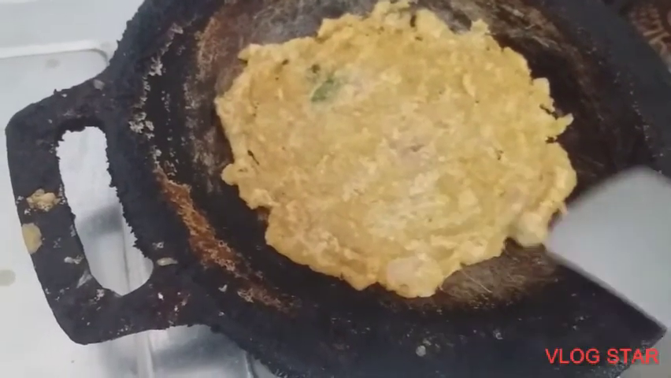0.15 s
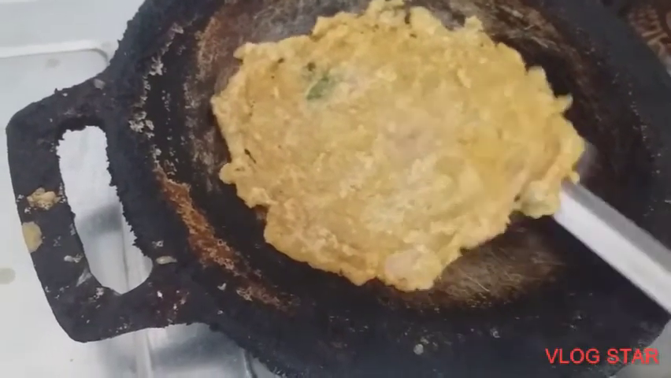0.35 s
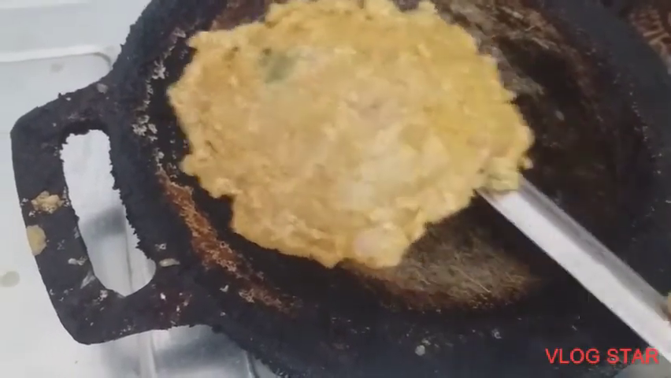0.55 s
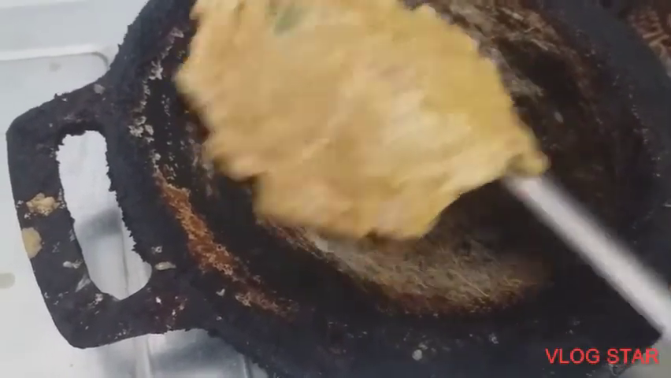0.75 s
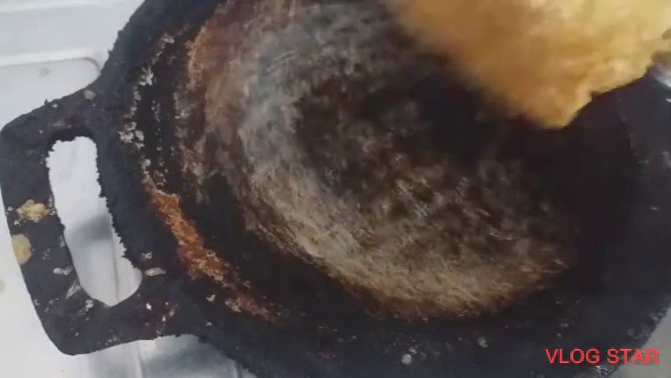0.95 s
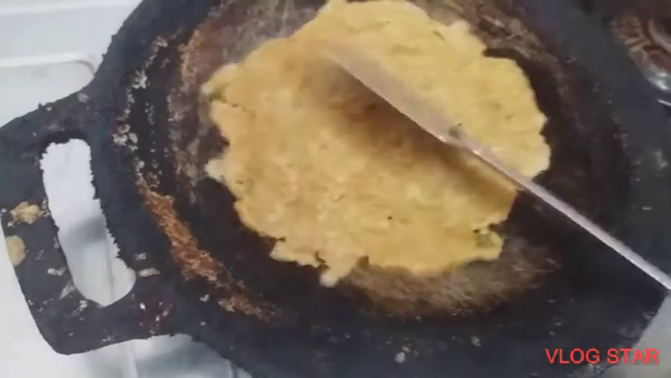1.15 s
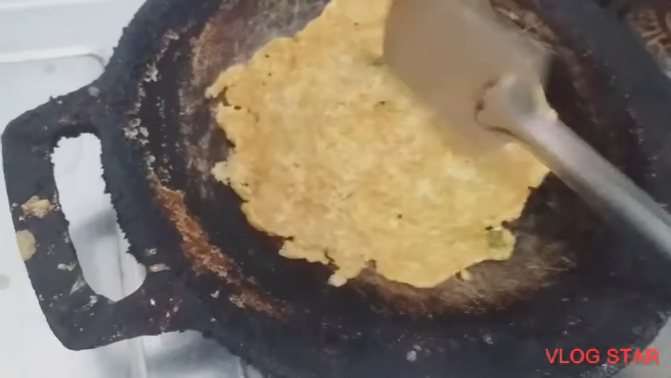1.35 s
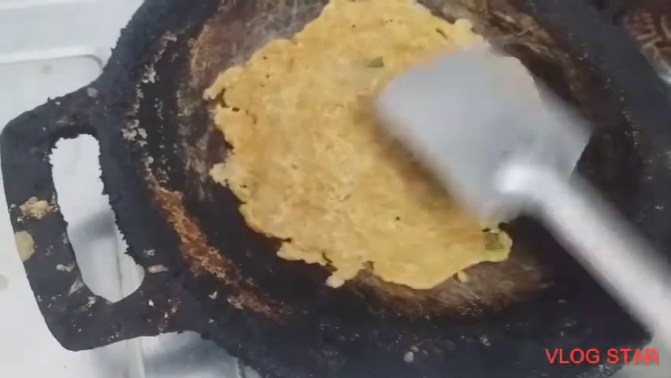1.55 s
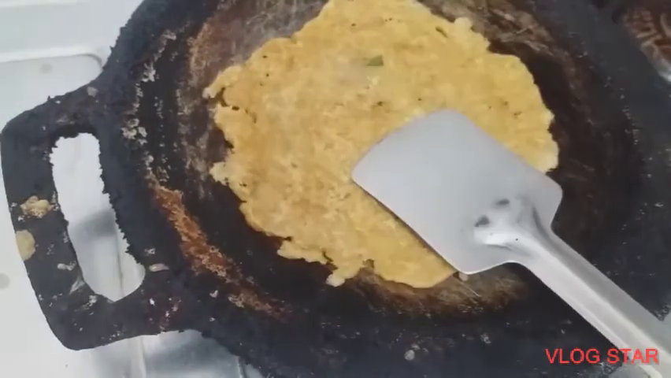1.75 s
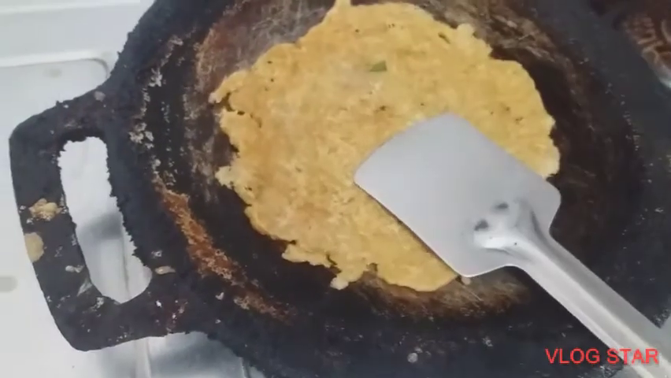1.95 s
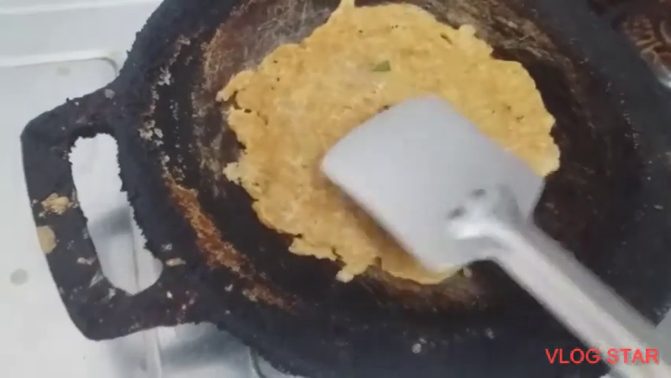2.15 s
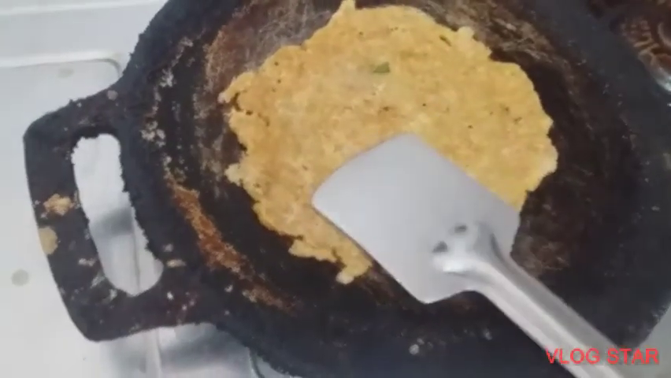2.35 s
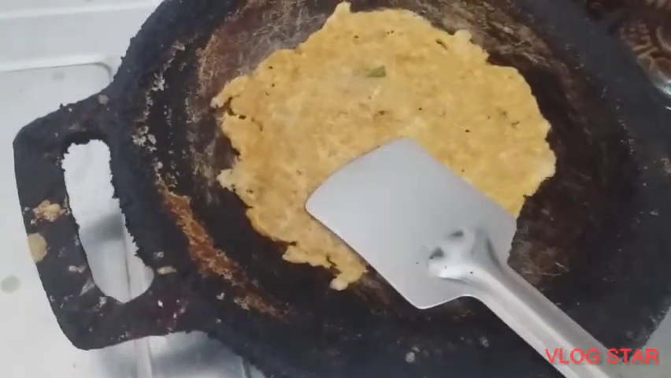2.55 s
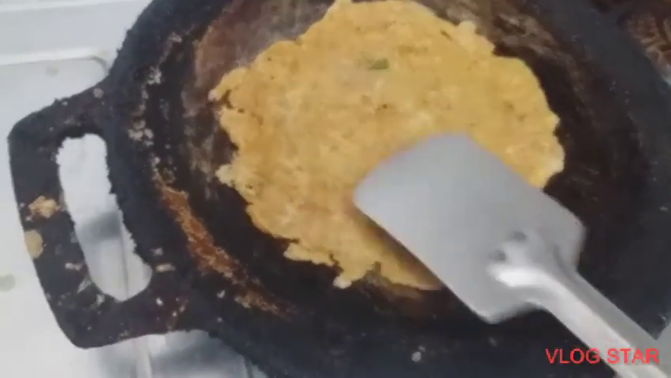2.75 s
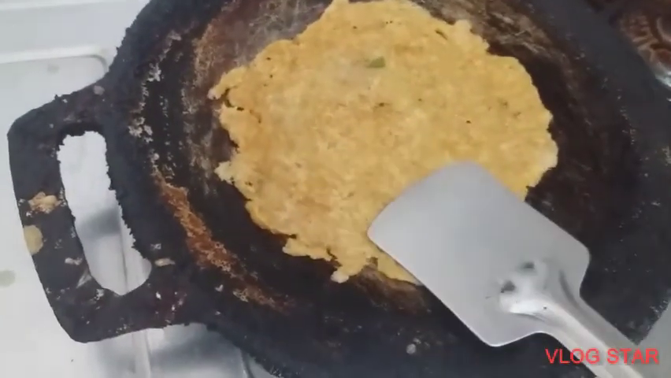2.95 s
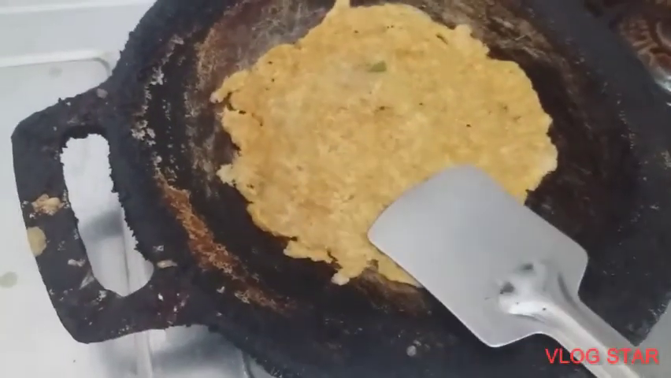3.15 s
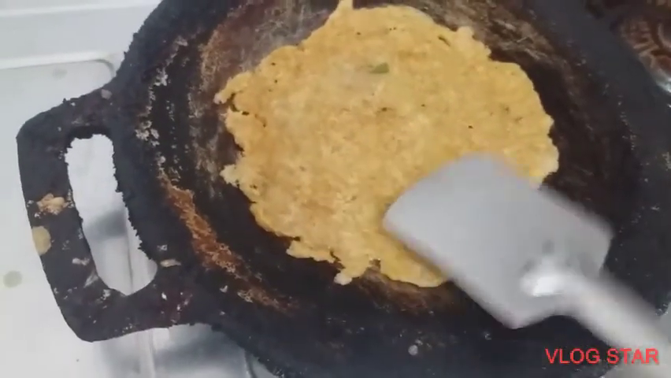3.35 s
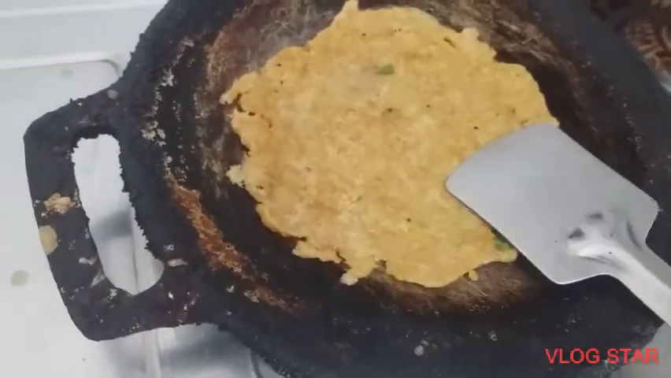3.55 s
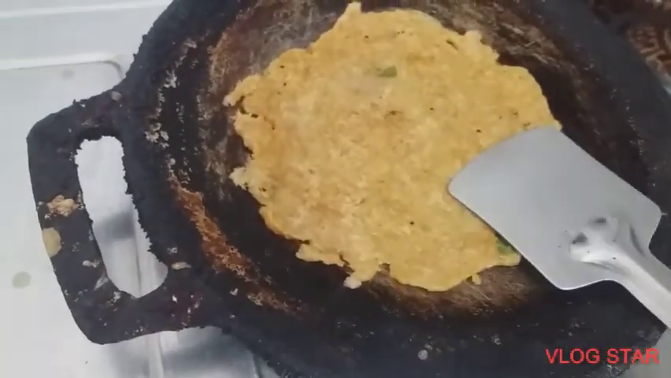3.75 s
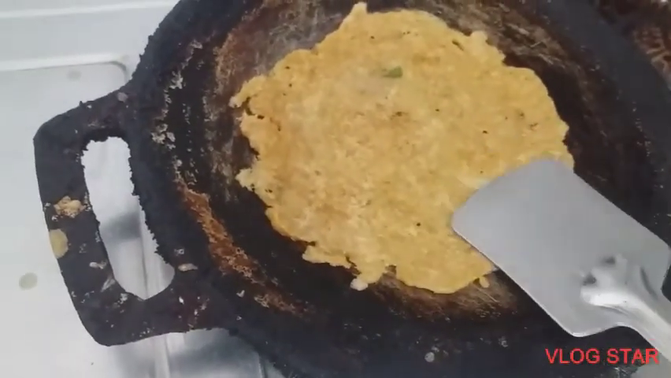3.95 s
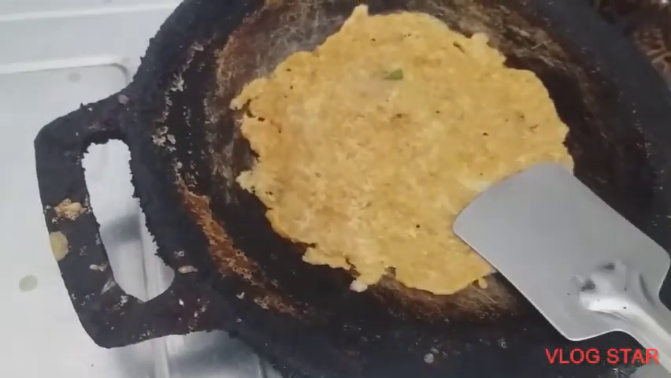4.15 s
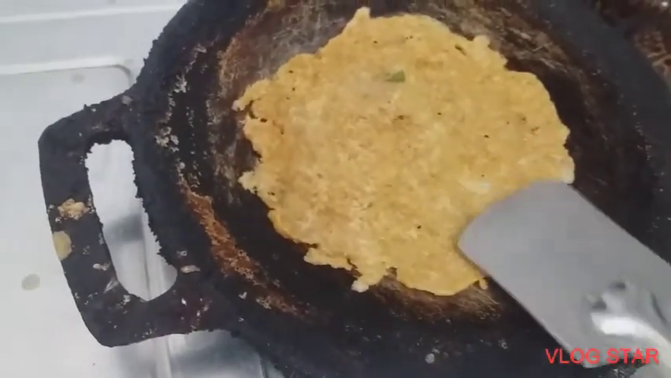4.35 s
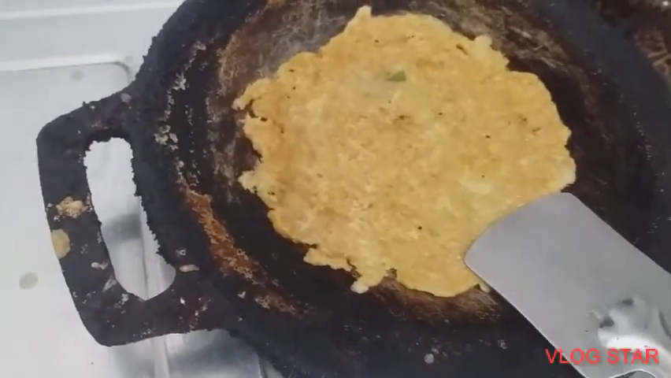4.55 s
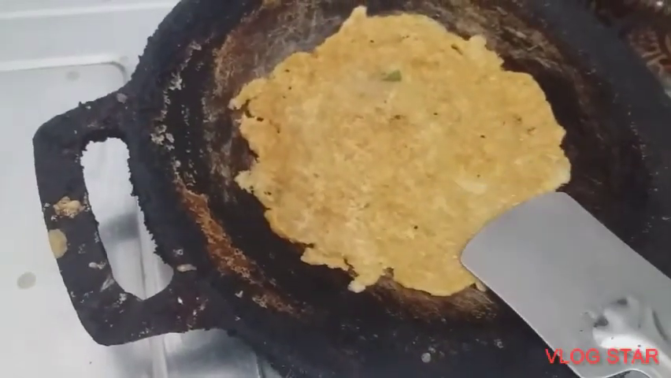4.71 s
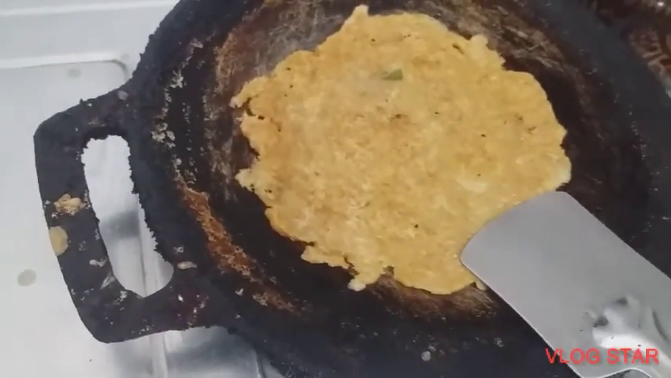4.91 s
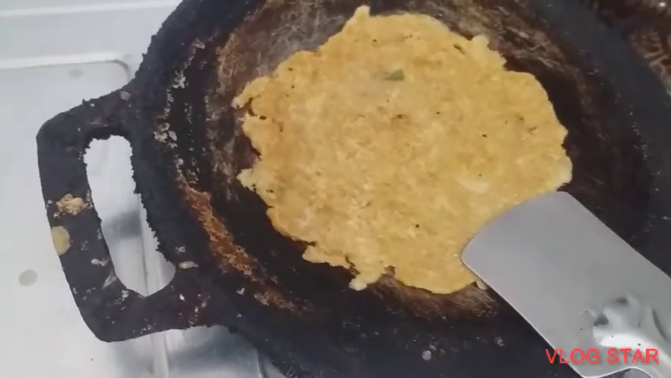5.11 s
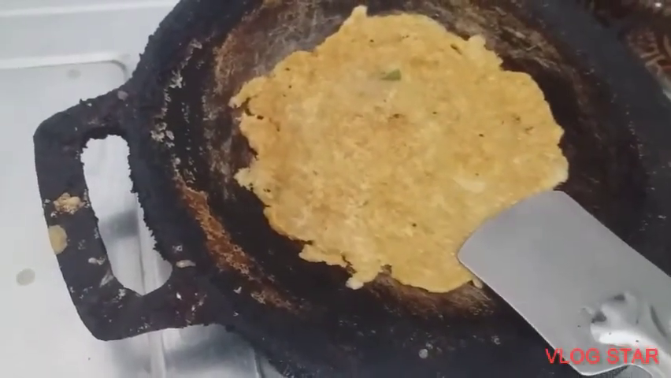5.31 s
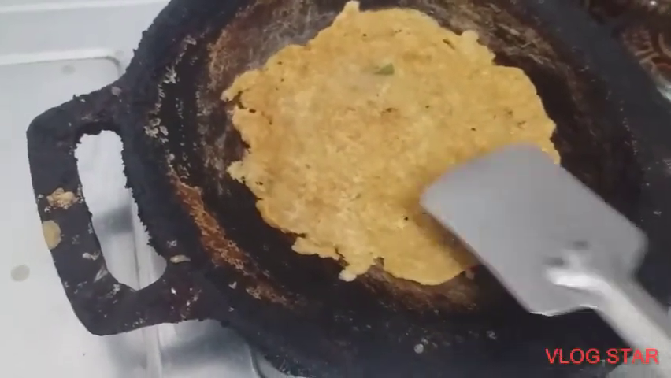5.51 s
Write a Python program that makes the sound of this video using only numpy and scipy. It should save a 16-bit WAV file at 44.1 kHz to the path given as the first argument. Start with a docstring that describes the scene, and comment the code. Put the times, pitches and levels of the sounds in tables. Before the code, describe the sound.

Close up in a small kitchen, a steel spatula pushes under a flatbread with a bright, ringing two-stroke scrape. After a short quiet gap the bread lands with a low thud, clatter and sharp snaps. A knock follows, then light presses make the crust crackle, busiest just after three seconds. It thins to sparse ticks before faint scratching near the end. Soft hiss and low hum sit beneath, with a short dull room echo.

```python
"""Flatbread on a griddle

A steel spatula slides under a flatbread on a cast-iron griddle, drops it back and presses it down several times.
Grit drives the blade's moving resonances as it scrapes; clicks, rings and noise make the crust crackle and snap.
The griddle thuds and rattles on the stove, through low and higher resonances and single decaying knocks.
Shaped noise and narrow hum lines fill the small kitchen, and feedback delays give its echo."""
import sys
import numpy as np
from scipy import signal
from scipy.fft import rfft, irfft, next_fast_len
from scipy.io import wavfile
from scipy.ndimage import uniform_filter1d

SR = 44100
rng = np.random.default_rng(int(sys.argv[2]) if len(sys.argv) > 2 else 0)


def transcribe(signal):
    """Save signal, clipped to [-1, 1], as a 16-bit WAV file at the path in sys.argv[1]."""
    frames = np.atleast_2d(signal).T
    limited = np.clip(frames, -1, 1)
    pcm = np.round(limited * 32767).astype(np.int16)
    wavfile.write(sys.argv[1], SR, pcm)


N = 250047
TIME = np.arange(N) / SR


def from_db(db):
    """Decibels to gain."""
    return 10 ** (np.asarray(db) / 20)


def to_db(gain):
    """Gain to decibels."""
    return 20 * np.log10(gain)


def rms_one(x):
    """Scale to rms 1."""
    return x / np.sqrt(np.mean(x ** 2) + 1e-20)


def lowpass(x, order, hz):
    """Butterworth lowpass."""
    return signal.sosfilt(signal.butter(order, hz, fs=SR, output="sos"), x)


def highpass(x, order, hz):
    """Butterworth highpass."""
    return signal.sosfilt(signal.butter(order, hz, "high", fs=SR, output="sos"), x)


def in_time(rows):
    """Columns of a curve table at every sample."""
    s, *columns = np.transpose(rows)
    return [np.interp(TIME, s, column) for column in columns]


def during(rows):
    """1 while a curve table lasts, with 20 ms fades."""
    fade_in = TIME - rows[0][0] + .02
    fade_out = rows[-1][0] - TIME
    return np.clip(np.minimum(fade_in, fade_out) / .02, 0, 1)


def peaked(start, end, rise_db_per_s, fall_db_per_s):
    """Gain 1 from start to end, rising before and falling after at steady dB rates."""
    before_db = (start - TIME) * rise_db_per_s
    after_db = (TIME - end) * fall_db_per_s
    return from_db(-np.maximum(0, np.maximum(before_db, after_db)))


def wander(n, count):
    """Slow chance: random points joined smoothly; spread about 1."""
    return signal.resample(rng.standard_normal(count), n)


def grains(per_s, spread_db):
    """Random clicks of either sign, their sizes spread exponentially in dB; rms 1."""
    sizes = from_db(spread_db * np.minimum(rng.exponential(1, N), 4))
    signed = sizes * rng.choice([-1, 1], N)
    return rms_one(signed * (rng.random(N) < per_s / SR))


def resonance(x, hz, width):
    """Two-pole resonance, gain 1 on top."""
    r = np.exp(-np.pi * width / SR)
    poles = [1, -2 * r * np.cos(2 * np.pi * hz / SR), r * r]
    return signal.lfilter([(1 - r * r) / 2, 0, (r * r - 1) / 2], poles, x)


def body(x, modes):
    """Resonances in parallel, signs alternating; the dB of each mode is its gain on top."""
    return sum((-1) ** k * from_db(db) * resonance(x, hz, width)
               for k, (hz, width, db) in enumerate(modes))


# Spectrum of the kitchen hiss. Each row: frequency in Hz, relative level in dB per Hz.
HISS_SPECTRUM = [(25, -28), (40, -13), (55, -7.5), (90, -7.5), (167, -10), (283, -14), (547, -12),
                 (1090, -15), (1840, -20), (5740, -23), (10000, -30.5), (16000, -27.5)]
HISS_RMS_DB = -58.0
# Hum lines. Each row: frequency in Hz, width in Hz, rms level in dB, steady share of the power from 0 to 1.
HUM_LINES = [(118, 30, -66, .1), (243, 10, -75, .2), (310, 12, -74, .2), (1086, 40, -72, .2),
             (380, 80, -60.5, .86)]


def background():
    """Smooth shaped hiss, and hum lines that are each a steady tone inside a narrow wavering band."""
    bin_hz = np.maximum(np.fft.rfftfreq(N, 1 / SR), 1)
    curve_hz, curve_db = np.transpose(HISS_SPECTRUM)
    shape_db = np.interp(np.log(bin_hz), np.log(curve_hz), curve_db)
    hiss = irfft(rfft(rng.standard_normal(N)) * from_db(shape_db), N)
    out = from_db(HISS_RMS_DB) * rms_one(hiss)
    white = rng.standard_normal(N + SR)   # the extra second lets the bands settle
    for hz, width, db, steady in HUM_LINES:
        band = rms_one(resonance(resonance(white, hz, width), hz, width)[SR:])
        tone = np.sqrt(2) * np.sin(2 * np.pi * hz * TIME)
        out += from_db(db) * (np.sqrt(steady) * tone + np.sqrt(1 - steady) * band)
    return out


KITCHEN_T60_S, KITCHEN_DB, WALL_CUT_HZ = 0.38, -19, 3300


def kitchen(x):
    """Ten feedback delays make the echo; dull walls take off treble on the way in."""
    size = next_fast_len(N + SR)
    w = 2 * np.pi * np.arange(size // 2 + 1) / size
    echoes = 0
    for k, lag in enumerate((rng.uniform(.009, .03, 10) * SR).astype(int)):
        loop = from_db(-60 * lag / SR / KITCHEN_T60_S) * np.exp(-1j * w * lag)
        echoes = echoes + (-1) ** k * loop / (1 - loop)   # all repeats of one delay
    dull = signal.lfilter(*signal.butter(1, WALL_CUT_HZ, fs=SR), x)
    return irfft(rfft(dull, size) * echoes, size)[:N]


# Griddle and stove top modes. Each row: frequency in Hz, width in Hz, gain in dB.
GRIDDLE_MODES = [(77.6, 28, -3), (115.8, 20, 2), (184, 56, -2), (242.8, 5.5, 6.5), (314, 49, 1),
                 (452, 86, 3), (583, 160, 1), (701, 130, 3.5), (884, 33, 3), (1008, 80, -1),
                 (1230.5, 10, 5), (1485, 420, -5.5)]
# Jolts of the griddle on the stove. Each row: time in seconds, deep thud level in dB,
# level in dB of the rattle above it before its lowpass.
GRIDDLE_JOLTS = [(0, -49, -47), (.082, -72, -58), (.4, -60, -55), (.526, -53, -63), (1.194, -37.5, -41),
                 (1.224, -45, -36.5), (1.696, -50, -66), (1.75, -52.5, -51), (1.994, -53, -57),
                 (2.324, -52.5, -54), (2.478, -56.5, -68), (2.64, -59.5, -58), (2.888, -66, -66),
                 (2.935, -54.5, -78), (2.952, -55, -42), (3.626, -49.5, -55), (3.69, -61, -52.5),
                 (4.95, -65, -70), (4.995, -64, -53.5)]
THUD_TOP_HZ, RATTLE_TOP_HZ = 400, 1480
JOLT_RISE_DB_PER_S, THUD_FALL_DB_PER_S, RATTLE_FALL_DB_PER_S = 606, 136, 232


def griddle():
    """Each jolt shakes the low modes into a thud and the higher ones into a shorter rattle."""
    low_modes = [mode for mode in GRIDDLE_MODES if mode[0] < THUD_TOP_HZ]
    high_modes = [mode for mode in GRIDDLE_MODES if mode[0] >= THUD_TOP_HZ]
    thud = rms_one(body(grains(500., spread_db=4.5), low_modes))
    rattle = rms_one(body(grains(900., spread_db=-1.5), high_modes))
    thud_gain, rattle_gain = 0, 0
    for s, thud_db, rattle_db in GRIDDLE_JOLTS:
        thud_gain = thud_gain + from_db(thud_db) * peaked(s, s, JOLT_RISE_DB_PER_S, THUD_FALL_DB_PER_S)
        rattle_gain = rattle_gain + from_db(rattle_db) * peaked(s, s, JOLT_RISE_DB_PER_S, RATTLE_FALL_DB_PER_S)
    return thud_gain * thud + rattle_gain * lowpass(rattle, 2, RATTLE_TOP_HZ)


# Single knocks of the griddle. Each row: start in seconds, level in dB before the soft rise,
# frequency in Hz of the mode that sings out, T60 in seconds.
GRIDDLE_KNOCKS = [(0.019, -36.5, 308, 0.11), (1.195, -34.5, 201, 0.061), (1.214, -29, 1207, 0.16),
                  (1.223, -28, 123, 0.11), (1.255, -34, 243, 0.22), (1.694, -19.5, 218, 0.031),
                  (1.712, -29.5, 121, 0.13), (1.755, -48.5, 238, 0.72), (1.97, -51, 112, 0.13),
                  (1.985, -41, 308.6, 0.21), (2.03, -55, 237, 0.39), (2.887, -29.5, 78, 0.11),
                  (2.921, -35, 119, 0.18), (3.613, -43.5, 309.7, 0.29)]


def knocks():
    """A soft blow: one mode swells with a time constant of about three cycles while it dies away."""
    out = np.zeros(N)
    for s, level_db, hz, t60 in GRIDDLE_KNOCKS:
        t = np.maximum(TIME - s, 0)
        soft_rise = 1 - np.exp(-t * hz / 2.9)
        out += from_db(level_db - 60 * t / t60) * soft_rise * np.sin(2 * np.pi * hz * t)
    return out


# The blade drags over the crust and hums. Each row: start in seconds, length in seconds, level in dB,
# lower ring in Hz.
BLADE_DRAGS = [(1.793, 0.26, -61, 2930), (2.45, 0.22, -65, 2400), (3.02, 0.28, -52, 3660),
               (4.703, 0.86, -62, 2880)]
DRAG_UPPER_RATIO, DRAG_UPPER_DB, DRAG_WIDTH_HZ, DRAG_FADE_DB_PER_S = 1.76, 1, 150, 153


def drags():
    """Grit under the resting blade rings two of its modes."""
    grit, out = grains(3000., spread_db=5.5), 0
    for s, length, db, hz in BLADE_DRAGS:
        lower = (hz, DRAG_WIDTH_HZ, 0)
        upper = (DRAG_UPPER_RATIO * hz, DRAG_UPPER_RATIO * DRAG_WIDTH_HZ, DRAG_UPPER_DB)
        gain = from_db(db) * peaked(s, s + length, DRAG_FADE_DB_PER_S, DRAG_FADE_DB_PER_S)
        out = out + gain * rms_one(body(grit, [lower, upper]))
    return out


# Modes of the blade resting on the bread. Each row: frequency in Hz, width in Hz,
# gain in dB lying flat, gain in dB tilted.
RESTING_BLADE = [(2020, 650, -1.5, -7), (2360, 84, 11, -9), (2815, 330, 5, -33), (3684, 75, -30, 13),
                 (4350, 1270, -4, -8.5), (4920, 330, 4.5, 3), (5640, 580, -3, 6.5), (6310, 1200, -9, 2)]


def resting_blade(x):
    """Colour a sound by the blade on the bread: once lying flat, once tilted."""
    flat = body(x, [(hz, width, flat_db) for hz, width, flat_db, _ in RESTING_BLADE])
    tilted = body(x, [(hz, width, tilted_db) for hz, width, _, tilted_db in RESTING_BLADE])
    return flat, tilted


# Bouts of crust crackle as the bread lands and the blade touches, presses and drags. Each row: start in
# seconds, length in seconds, relative level in dB, top octave in dB against that, blade tilt from 0 to 1.
CRACKLE_BOUTS = [(1.13, 0.015, -46.5, -10, 0.14), (1.171, 0.036, -36.5, -7, 0.22),
                 (1.205, 0.0087, -25, -6.5, 0.6), (1.226, 0.12, -54, -4, 0.24),
                 (1.692, 0.005, -40.5, -8.5, 0.33), (1.79, .28, -54, -11, 0.39),
                 (2.293, 0.0064, -50, -15, .3), (2.444, 0.21, -49.5, -7.5, 0.25),
                 (2.886, 0.032, -50.5, -25, 0.24), (3.02, 0.28, -50, -5.5, 0.48),
                 (3.086, 0.062, -41, -5, 0.96), (3.59, 0.5, -59.5, -7, 0.55),
                 (4.234, 0.071, -57, -2.5, 0.54), (4.633, 0.73, -56, -2.5, .45),
                 (4.934, 0.11, -52, -5.5, 0.38), (5.462, 0.027, -50, -3, 0.6)]
BOUT_RISE, BOUT_FALL, BOUT_FALL_S = 0.27, 0.35, .012   # time for 10 dB: shares of the length, added seconds


def bouts():
    """Gain of the crackle, gain of its top octave and power-weighted blade tilt, at every sample."""
    power, top_power, tilted_power = 1e-12, 1e-12, 0
    for s, length, db, top_db, tilt in CRACKLE_BOUTS:
        rise, fall = 10 / (BOUT_RISE * length), 10 / (BOUT_FALL * length + BOUT_FALL_S)
        bout_power = (from_db(db) * peaked(s, s + length, rise, fall)) ** 2
        power = power + bout_power
        top_power = top_power + bout_power * from_db(2 * top_db)
        tilted_power = tilted_power + bout_power * tilt
    return np.sqrt(power), np.sqrt(top_power), tilted_power / power


def crackle(gain, top_gain, tilt):
    """Dense small breaks in the crust, coloured by the blade that lies on it."""
    breaks = grains(4000., spread_db=4.0)
    flat, tilted = resting_blade(breaks)
    band = signal.butter(2, [1400, 7500], "band", fs=SR, output="sos")
    broad = rms_one(signal.sosfilt(band, breaks))
    top = rms_one(highpass(breaks, 4, 8500))
    ringing = (1 - tilt) * rms_one(flat) + tilt * rms_one(tilted) + from_db(-6) * broad
    return from_db(-5) * gain * ringing + from_db(-3) * top_gain * top


# Clear crust snaps and blade taps. Each row: start in seconds, relative peak in dB, ring in Hz,
# crack in dB against the ring, relative level of the top octave in dB.
CLEAR_SNAPS = [(.107, -24.5, 4500, 15, -8), (.349, -18, 5350, -14, -15), (.7896, -39, 6000, 15.5, -23),
               (1.1256, -34, 2800, -8, -11), (1.157, -34, 2150, 3, -22), (1.1804, -13.5, 2670, -11, -19),
               (1.197, -17, 2160, -24, -18), (1.2075, -13, 6030, 10, -18), (1.2113, -13, 5000, -6, -21),
               (1.222, -19, 2180, -3, -19), (1.2485, -20, 2116, -27.5, -20), (1.283, -22, 1570, -3, -12),
               (1.6937, -26.5, 3550, 0, -21), (1.7909, -36, 5040, 12, -12), (1.85, -27, 4820, -2, -12),
               (1.8742, -32.5, 5860, 15, -18), (1.925, -23.5, 5760, -2, -21), (1.9326, -31, 2850, -7, -23),
               (2.018, -35, 2960, -4, -18), (2.071, -35.5, 5930, 1, -18), (2.2965, -38, 2820, -2, -11),
               (2.355, -37.5, 2880, 1, -24), (2.478, -29, 2430, -4, -17), (2.497, -24.5, 2380, -3, -8),
               (2.5014, -31, 4590, 2, -12), (2.5398, -35, 5070, 8, -6), (2.573, -37, 4310, -5, -4),
               (2.5908, -31, 2920, 6, -9), (2.6332, -22.5, 2340, 4, -26), (2.6643, -34, 2010, -3, -24),
               (2.7075, -37, 2990, 11, -8), (2.8868, -32, 3960, -9, -8), (2.8998, -24.5, 6030, 1, -25),
               (2.9255, -32, 6000, -6, -27), (2.9414, -30.5, 3600, -18, -30), (2.995, -36, 3730, 1, -5),
               (3.0294, -32, 3800, -7, -7), (3.0608, -24, 5900, -6, -18), (3.085, -20, 3610, -18, -5.5),
               (3.1221, -23, 2220, -22, -9), (3.1339, -14.5, 3580, 2, -14), (3.1375, -20, 3820, 2, -5),
               (3.143, -17.5, 2740, -4, -22), (3.1555, -27, 5030, 0, -10), (3.1918, -31, 4000, 15, -13),
               (3.2334, -31, 3600, 9, -11), (3.262, -29, 2670, 5, -19), (3.2767, -30.5, 4000, -4, -15),
               (3.2832, -31, 3000, 12, -12), (3.2937, -33, 3700, -11, -18), (3.3205, -11.5, 3920, 7, -16),
               (3.323, -22, 2760, -2, -22), (3.3294, -23, 3550, 4, -21), (3.3444, -31, 4330, 9, -14),
               (3.358, -37, 6430, 0, -7), (3.5807, -37, 5100, -3, -9), (3.5851, -36, 3800, 6, -11),
               (3.615, -39.5, 3850, -9, -17), (3.7515, -40.5, 6150, 17, -5), (4.095, -43, 5000, 4, -2),
               (4.2445, -35, 6220, 1, -6), (4.282, -44, 5800, 2, -1), (4.729, -41, 3180, 14, -14),
               (4.9377, -33, 2720, -6, -7), (4.942, -33, 4870, -7, -23), (4.9573, -37, 4820, -3, -14),
               (4.979, -31.5, 6000, -2, -13), (4.9878, -32, 2760, 0, -8), (5.049, -45, 2920, -5, -15),
               (5.1865, -40, 4730, -15, -3), (5.214, -32.5, 2800, 2, -9), (5.2208, -29, 4980, -8, -26),
               (5.3032, -31, 4570, -7, -6), (5.3198, -20, 4900, 4, -11), (5.4358, -34, 4930, -1, -4),
               (5.462, -32, 5540, 11, -15), (5.47, -29.5, 4640, -2, 0), (5.4828, -28, 5030, 6, -18),
               (5.4903, -28.5, 4570, 0, -12), (5.503, -34, 4700, 2, -21)]
SNAP_TRIM_DB, TICK_TRIM_DB, CRUMBLE_DB = -7.5, 5.5, 4.0   # applied to all snaps, their ticks, their crumbles
CRACK_HZ, CRACK_T60_S, TICK_T60_S = 4060, 0.0011, 0.014
SNAP_T60_S, SHARP_SHORTENS = 0.011, 0.37   # ring T60 at 0 dB of crack; dB it shortens for each dB of crack
CRUMBLE_LASTS = 1.63   # times the ring
# random faint snaps: rate, highest peak above the crackle, top octave against that of the crackle
FAINT_PER_S, FAINT_DB, FAINT_TOP_DB = 25., 15, -6.5


def faint_snaps(gain, top_gain):
    """Rows for small snaps at random times, which follow the level of the crackle."""
    at = np.flatnonzero(rng.random(N) < FAINT_PER_S / SR)
    size, pitch, sharpness = rng.random((3, len(at)))
    peak_db = to_db(gain[at]) + FAINT_DB - 8 * size
    top_db = to_db((top_gain / gain)[at]) + FAINT_TOP_DB
    return np.transpose([at / SR, peak_db, 2400 * 2.6 ** pitch, 12 * sharpness - 6, top_db])


def snaps(gain, top_gain, blade_tilt):
    """Each snap is a sharp crack, a short ring with a pitch of its own, a brief crumble and a bright tick."""
    length = 3000   # samples
    out, t = np.zeros(N + length), np.arange(length) / SR
    rows = np.vstack([CLEAR_SNAPS, faint_snaps(gain, top_gain)])
    rough = rng.standard_normal((len(rows), length))
    ticks = highpass(rough, 4, 8500) * from_db(-60 * t / TICK_T60_S)
    tilt = blade_tilt[(rows[:, :1] * SR).astype(int)]
    flat, tilted = resting_blade(rough)
    crumbs = (1 - tilt) * flat + tilt * tilted
    crack = np.sin(2 * np.pi * CRACK_HZ * t) * from_db(-60 * t / CRACK_T60_S)
    for (s, peak_db, hz, crack_db, top_db), tick, crumb in zip(rows, ticks, crumbs):
        t60 = SNAP_T60_S * from_db(-SHARP_SHORTENS * crack_db)
        ring = np.sin(2 * np.pi * hz * t) * from_db(-60 * t / t60)
        crumble = from_db(CRUMBLE_DB) * crumb * from_db(-60 * t / (CRUMBLE_LASTS * t60))
        sound = ring + crumble + from_db(crack_db) * crack + from_db(top_db + TICK_TRIM_DB) * tick
        at = round(s * SR)
        out[at:at + length] += from_db(peak_db + SNAP_TRIM_DB) * highpass(sound, 2, 1500)
    return out[:N]


# The slide under the bread, two pushes. Each row: time in seconds, level in dB.
SLIDE_LEVEL = [(0, -46.5), (.05, -49.5), (.11, -36), (.2, -31), (.26, -37), (.32, -33), (.4, -23),
               (.46, -27), (.55, -38), (.7, -52), (.9, -62)]
# Stage of the stroke. Each row: time in seconds, stage (0 blade free, 1 under the bread, 2 lifting off).
STROKE_STAGE = [(0, 0), (.1, 0), (.2, .3), (.3, .6), (.395, 1), (.49, 1.1), (.6, 2), (.9, 2)]
# Blade mode pitches. Each row: frequency in Hz at stages 0, 1 and 2.
BLADE_PITCHES = [(727, 760, 760), (1260, 1110, 1170), (1650, 1870, 1860), (1640, 1710, 1730),
                 (2100, 2160, 2150), (2520, 2340, 2500), (2740, 2890, 2760), (2900, 3020, 3050),
                 (3300, 3420, 3400), (3670, 3770, 3950), (4140, 4270, 4250), (4790, 4600, 4670),
                 (5250, 5010, 5160), (5400, 5310, 5480), (5700, 5880, 5860), (6210, 6300, 6250),
                 (8870, 8900, 8900), (9750, 9930, 9750), (10800, 10800, 11000), (11500, 11600, 11600),
                 (12200, 12800, 12000), (12900, 13400, 13400), (13300, 14200, 13700), (15300, 15300, 15400)]
# Blade mode strengths, in the order of the pitches. Each row: width in Hz, then the gain in dB
# at each of the level stages.
BLADE_LEVELS = [(29.6, -4.5, -14, -51, -11.5, -1.5), (24.6, -12, -0.5, -12, -18, 7.5),
                (31.2, -20, 4.5, -29, 12, -5), (58, -16, -41, -43, -48, -2.5),
                (40, -1.5, -42, -22, -0.5, 3), (59, -29, -42, -5, 0.5, -4), (67.7, -5, 9, -4, 7.5, 3.5),
                (49.6, 0, -19, 5, -8, 3), (50, -5, -20, -24, -11, -8), (70.5, -7, -13, -22, -9, -2),
                (50.4, 0.5, -0.5, 3, 4, -3), (45, -4, -3, -1.5, 6.5, 1), (60, -5, 2.5, -6, -5, 1),
                (45.2, -5, -6, -10, -33, 4), (85, -1.5, -40, -15, -37, -3), (90, -7, -27, -13, -43, -12),
                (60.6, -15, -23, -31, -43, -24.0), (60.6, -15, -14, -23, -15, -22),
                (50, -24, -25, -8, -10, -32), (60, -21, -13, -24, -22, -21), (68, -11, -25, -12, -13, -24),
                (90, -17, -17, -10, -32, -18.0), (45, -11, -2, -15.0, -29, -12.0),
                (71, -20, -36, -10, -34, -18)]
# Stages of the stroke at which those gains are given, a plain list.
LEVEL_STAGES = [0, .35, .7, 1, 2]
RASP_DB, RASP_SINKS = -29.5, 1   # toneless rasp gain at the start; dB it sinks for each dB the slide gains
PITCH_JITTER, LOOSE_JITTER = 0.0028, 0.0096   # share of pitch; added per stage as the blade lifts off
GRIT_LUMPS_DB, MODE_FLICKER_DB = 1, 3   # the edge catches unevenly; each mode comes and goes


def scrape():
    """Grit under the edge drives the blade modes; each shifts and swells as the bread loads the blade."""
    n = int(SLIDE_LEVEL[-1][0] * SR)
    level_db, stage = [curve[:n] for curve in in_time(SLIDE_LEVEL) + in_time(STROKE_STAGE)]
    grit, song = grains(5000., spread_db=2.0)[:n], np.zeros(n)
    jitter = PITCH_JITTER + LOOSE_JITTER * np.maximum(stage - 1, 0)
    for stage_hz, (width, *stage_db) in zip(BLADE_PITCHES, BLADE_LEVELS):
        hz = np.interp(stage, [0, 1, 2], stage_hz) * (1 + jitter * wander(n, count=70))
        # a resonance with a moving centre: shift the grit down, smooth it, shift it back
        turn, r = np.exp(2j * np.pi * np.cumsum(hz) / SR), np.exp(-np.pi * width / SR)
        mode = turn * signal.lfilter([1 - r], [1, -r], grit / turn)
        mode_db = np.interp(stage, LEVEL_STAGES, stage_db) + MODE_FLICKER_DB * wander(n, count=30)
        song += from_db(mode_db) * mode.real
    rasp_db = RASP_DB - RASP_SINKS * (level_db - level_db[0])
    sound = song + from_db(rasp_db) * highpass(grit, 2, 1500)
    # level out the sound, then give it the slide's own level
    loudness = np.sqrt(uniform_filter1d(sound ** 2, size=2500))
    stroke = from_db(level_db + GRIT_LUMPS_DB * wander(n, count=70)) * sound / loudness
    return during(SLIDE_LEVEL) * np.pad(stroke, (0, N - n))


def scene():
    """Everything on the stove, its echo in the kitchen and the background."""
    crust = bouts()
    stove = griddle() + knocks() + drags() + crackle(*crust) + snaps(*crust) + scrape()
    return (stove + from_db(KITCHEN_DB) * kitchen(stove) + background())[None]


MIC_BASS_HZ, CUTOFF_HZ = 65.5, 16200
MIC_DIP_HZ, MIC_DIP_WIDTH_HZ, MIC_DIP_DB = 8070, 2640, -8.5


def record(dry):
    """A small microphone with a dip in its treble and little deep bass; the top is cut."""
    dry = highpass(dry, 2, MIC_BASS_HZ)
    dipped = dry - (1 - from_db(MIC_DIP_DB)) * resonance(dry, MIC_DIP_HZ, MIC_DIP_WIDTH_HZ)
    return signal.sosfilt(signal.cheby2(20, 60, CUTOFF_HZ, fs=SR, output="sos"), dipped)


dry = scene()
out = record(dry)
transcribe(out)
```